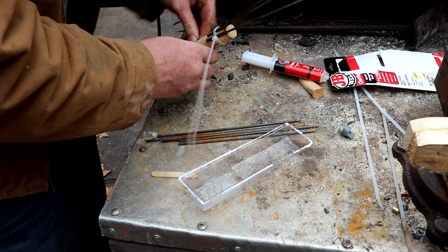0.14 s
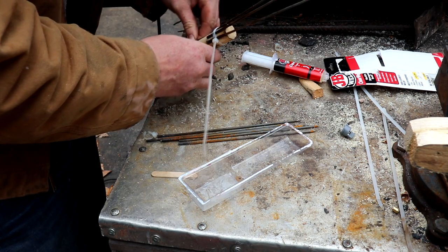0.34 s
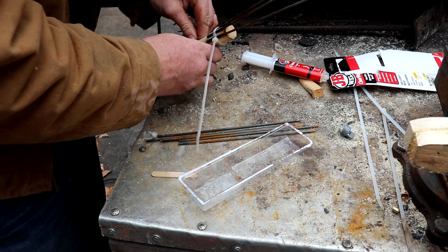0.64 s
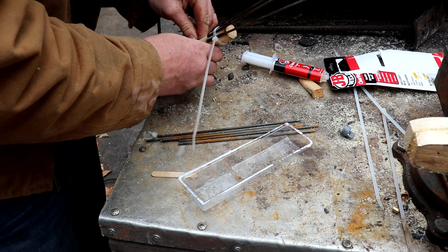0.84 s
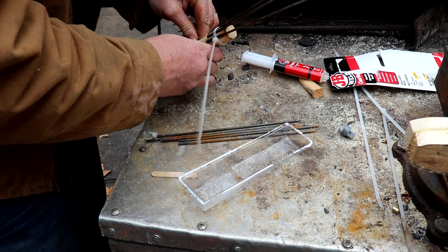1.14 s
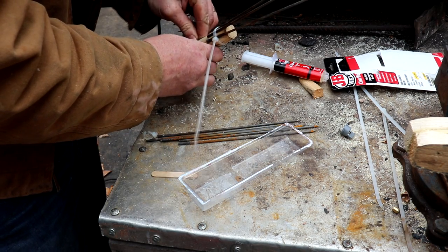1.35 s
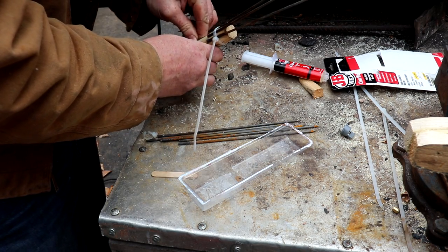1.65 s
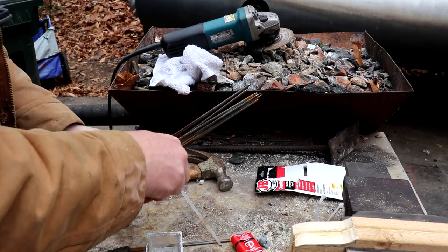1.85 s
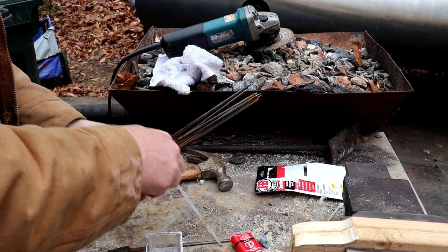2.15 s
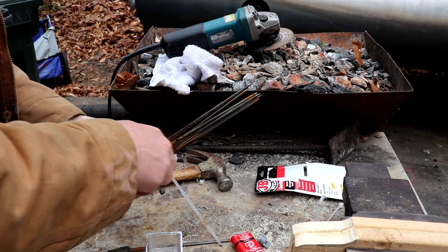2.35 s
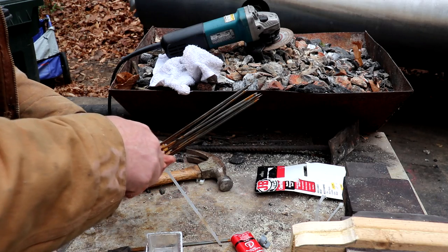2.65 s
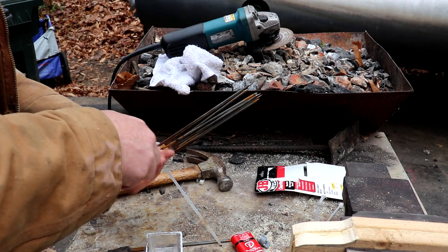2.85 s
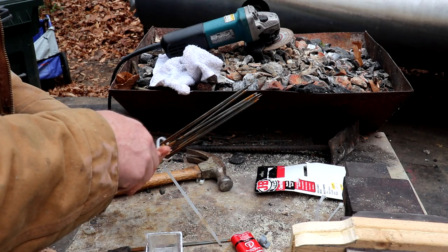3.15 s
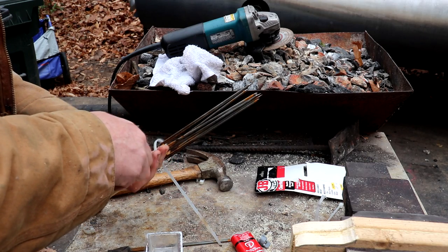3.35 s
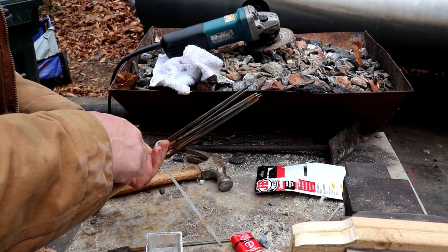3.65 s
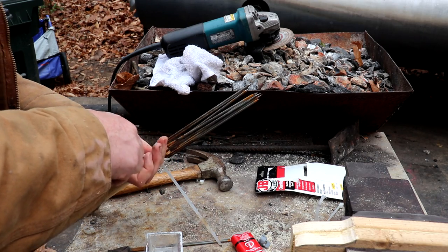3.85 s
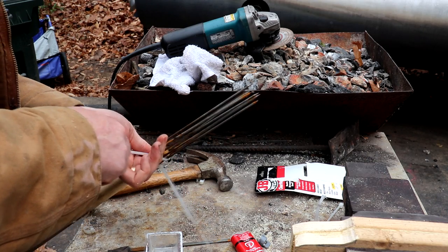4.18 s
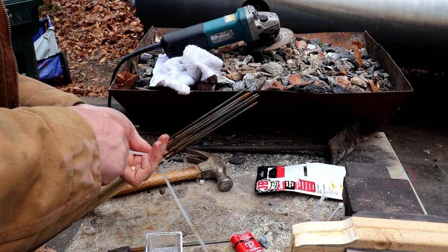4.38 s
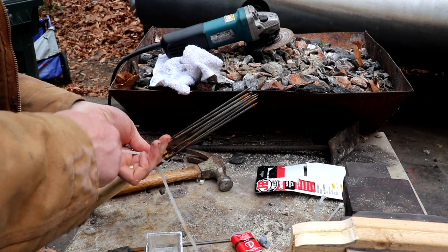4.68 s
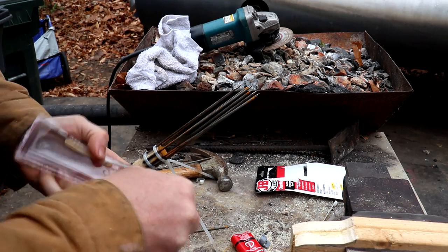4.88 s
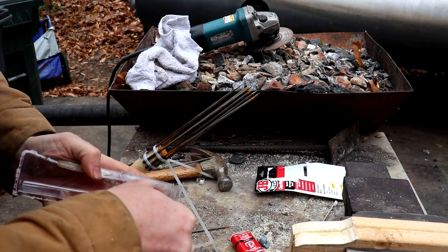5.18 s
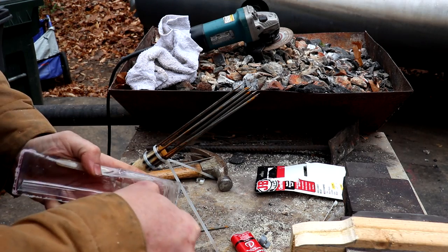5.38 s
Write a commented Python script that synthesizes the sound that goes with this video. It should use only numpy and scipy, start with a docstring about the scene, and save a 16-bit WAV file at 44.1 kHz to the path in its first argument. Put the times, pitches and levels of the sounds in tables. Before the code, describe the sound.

On a workbench in an open shed, a canvas sleeve rustles and steel rods clink and knock. One plastic zip tie ratchets in quick tugs while a thin squeal sounds further off. A second tie follows, slowing to separate sharp clicks as it tightens. Last, a plastic case snaps shut with two cracks. The microphone is close, with a low outdoor rumble behind.

```python
"""A workbench in an open shed, one microphone close by, a low rumble and faint hiss from outdoors.
A canvas sleeve rustles and single zip-tie teeth jolt a bundle of steel rods against the bench.
Further off a bird calls once and a thin squeal comes and goes. Close up, two straps run through
their ratchets in turn, tooth by tooth, the second until it is taut round the rods.
Last, a clear plastic case is snapped shut, with a brief bright echo after each crack."""
import sys
import numpy as np
from scipy import signal
from scipy.fft import rfft, irfft
from scipy.io import wavfile

SR = 44100
rng = np.random.default_rng(int(sys.argv[2]) if len(sys.argv) > 2 else 0)


def materialize(psi):
    """Save the field psi as 16-bit PCM at rate SR to the path in sys.argv[1].

    A 1-D psi becomes a single channel; in a 2-D psi each row is a channel.
    """
    bounded = np.clip(np.atleast_2d(psi).T, -1, 1)
    quanta = np.round(bounded * 32767).astype(np.int16)
    wavfile.write(sys.argv[1], SR, quanta)


N = 243431
TIME = np.arange(N) / SR


def from_db(db):
    """Decibels to gain."""
    return 10 ** (np.asarray(db) / 20)


def unit_rms(x):
    """Scale to unit power."""
    return x / np.sqrt(np.mean(x ** 2) + 1e-20)


def in_time(rows):
    """Each column of a curve at every sample."""
    times, *columns = np.transpose(rows)
    return [np.interp(TIME, times, column) for column in columns]


def drift(rate_hz):
    """A random wander of rms 1, mostly slower than rate_hz."""
    rolloff = 1 + (np.fft.rfftfreq(N, 1 / SR) / rate_hz) ** 2
    return unit_rms(irfft(rfft(rng.standard_normal(N)) / rolloff, N))


def noise(spectrum):
    """Noise of the given colour, rms 1."""
    hz, db = np.transpose(spectrum)
    grid_hz = np.fft.rfftfreq(N, 1 / SR) + 1
    colour = from_db(np.interp(np.log(grid_hz), np.log(hz), db))
    return unit_rms(irfft(rfft(rng.standard_normal(N)) * colour, N))


def clicks(times, sizes):
    """One impulse at each time."""
    return np.bincount(np.clip(np.round(times * SR).astype(int), 0, N - 1), sizes, N) + 1e-18


def crackle(impulses, tail_s, tail_db):
    """Each contact is followed by a dying spray of tiny ones, holding tail_db of its energy."""
    r = np.exp(-2 / (tail_s * SR))
    power = signal.lfilter([1 - r], [1, -r], impulses ** 2)
    return impulses + from_db(tail_db) * np.sqrt(power) * rng.standard_normal(N)


def resonance(x, hz, width_hz):
    """A band resonance of gain 1 at its top."""
    r, w = np.exp(-np.pi * width_hz / SR), 2 * np.pi * hz / SR
    return signal.lfilter(np.array([1, 0, -1]) * (1 - r * r) / 2, [1, -2 * r * np.cos(w), r * r], x)


def ring(x, hz, t60_s):
    """A unit click sets a sine of height 1 ringing."""
    r, w = np.exp(-np.log(1000) / (t60_s * SR)), 2 * np.pi * hz / SR
    return signal.lfilter([0, np.sin(w)], [1, -2 * r * np.cos(w), r * r], x)


def whistle(hz, gain, waver, waver_hz, flutter_db, flutter_hz):
    """A near sine whose pitch and level tremble."""
    phase = 2 * np.pi * np.cumsum(hz * (1 + waver * drift(waver_hz))) / SR
    return np.sqrt(2) * gain * from_db(flutter_db * drift(flutter_hz)) * np.sin(phase)


# colours of the rumble and the hiss: frequency_hz, relative_db
RUMBLE_COLOUR = [(25, -77), (50, -9), (115, 4.5), (210, 2), (400, -19), (1000, -37.5)]
HISS_COLOUR = [(300, 2), (1000, -4.5), (2000, -15.5), (3400, -13), (4800, -24), (8000, -23.5), (15000, -32)]
# level of the rumble: time_s, level_db
RUMBLE_LEVEL = [(0, -64), (1.7, -49), (4.0, -47.5), (4.2, -44), (5.52, -47)]

def outdoors(hiss_db=-53.5, wander_db=1.4):
    """From beyond the shed, a low rumble under faint hiss; the rumble is louder after the first seconds."""
    rumble_db = in_time(RUMBLE_LEVEL)[0] + wander_db * drift(rate_hz=2.6)
    return from_db(rumble_db) * noise(RUMBLE_COLOUR) + from_db(hiss_db) * noise(HISS_COLOUR)


# colour of rubbing canvas: frequency_hz, relative_db
CANVAS_COLOUR = [(50, -31), (180, 1), (800, -1), (1200, -4.5), (3500, -6), (4600, -15), (7000, -23),
                 (15000, -30)]
# strokes of sleeve and hands: start_s, end_s, level_db
SLEEVE_STROKES = [(0, 0.551, -47), (1.107, 1.367, -54), (4.092, 4.28, -41.5), (4.292, 4.66, -52.5),
                  (5.1, 5.26, -46.5), (5.521, 5.52, -42.5)]

def sleeve(attack_s=0.093, release_s=0.019, rest_db=-59.5, grain_db=2.0, grain_hz=250):
    """Near the microphone, canvas rubs in many tiny catches; strokes swell, hold and die away."""
    power = from_db(rest_db) ** 2
    for start_s, end_s, db in SLEEVE_STROKES:
        fade = np.maximum(start_s - TIME, 0) / attack_s + np.maximum(TIME - end_s, 0) / release_s
        power = power + (from_db(db) * np.exp(-fade)) ** 2
    return np.sqrt(power) * unit_rms(noise(CANVAS_COLOUR) * from_db(grain_db * drift(grain_hz)))


# jolts of the bundle: start_s, bench_thump_db, rod_ring_db, plastic_snap_db
ROD_JOLTS = [(0.05, -36, -37, -64), (0.772, -33.5, -37, -78), (0.848, -37.5, -40, -73),
             (1.036, -30, -28, -62), (1.102, -36.5, -40, -60), (1.136, -30, -26.5, -33.5),
             (1.297, -28.5, -28, -31.5), (1.414, -29, -26.5, -32.5), (1.518, -38, -26.5, -31),
             (1.636, -35.5, -25, -31), (3.316, -66.5, -44.5, -43.5)]
# modes of the rods lying on the bench: pitch_hz, gain_db, t60_s
ROD_MODES = [(144.4, -8.5, 0.26), (224.3, 1, 0.27), (297, -3, 0.076), (391, -8, 0.045), (866, -10, 0.04),
             (1252, -6, 0.036), (1356, -6.5, 0.11), (1515, -8.5, 0.082), (1765, -6.5, 0.036),
             (2060, -15, 0.11), (2426, -2.5, 0.02), (2750, -9.5, 0.038), (3320, 6.5, 0.01),
             (5000, 4, 0.0018), (6900, 8.5, 0.0021), (8800, 7.5, 0.0018), (11560, 9, 0.0018)]

def rods(scatter_db=2.0):
    """Close up, jolted rods chatter; thump, ring and snap weight the low, middle and high modes."""
    times, thump_db, ring_db, snap_db = np.transpose(ROD_JOLTS)
    blows = clicks(times, np.ones(len(times)))
    chatter = crackle(blows, tail_s=0.0056, tail_db=0.5)
    latest_jolt = np.maximum(np.searchsorted(times - .002, TIME) - 1, 0)
    out = np.zeros(N)
    for k, (hz, db, t60_s) in enumerate(ROD_MODES):
        if hz < 500:   # the heavy bench feels only the first blow
            drive, blow_db = blows, thump_db
        else:
            sharpness = np.clip((hz - 1800) / 3000, 0, 1)
            drive, blow_db = chatter, (1 - sharpness) * ring_db + sharpness * snap_db
        size = from_db(db + blow_db + scatter_db * rng.standard_normal(len(times)))
        out += (-1) ** k * ring(drive * size[latest_jolt], hz, t60_s)
    return out


# colour of the shed's reflections: frequency_hz, relative_db
SHED_COLOUR = [(150, -14.5), (400, 19), (2300, 0.5), (3200, 6.5), (4350, 2.5), (5200, 6), (12000, -1.5),
               (16000, -21.5)]

def shed(x, build_s=0.0034, body_t60_s=0.24, treble_t60_s=0.12, split_hz=7000):
    """Reflections from tools, walls and roof build up at the microphone and die, the treble first."""
    scatter = noise(SHED_COLOUR)
    body = signal.sosfiltfilt(signal.butter(2, split_hz, fs=SR, output="sos"), scatter)
    treble = scatter - body
    dying = body * 1000 ** (-TIME / body_t60_s) + treble * 1000 ** (-TIME / treble_t60_s)
    tail = (dying * (1 - np.exp(-TIME / build_s)))[:SR // 2]
    return signal.fftconvolve(x, tail / np.sqrt(np.sum(tail ** 2)))[:N]


# scuffs of fingers, rods and bench, then (last two rows) a brief bright echo after each crack
# of the case: peak_s, level_db, centre_hz, width_hz, half_length_s
SCUFFS_AND_ECHOES = [(0.209, -41, 740, 350, 0.035), (0.25, -52.5, 3470, 600, 0.18),
                     (1.175, -45.5, 2460, 1500, 0.034), (4.16, -41.5, 120, 69.5, 0.098),
                     (4.246, -37, 2730, 1600, 0.022), (5.168, -42, 4200, 900, 0.033),
                     (5.277, -41.5, 3900, 1900, 0.032)]

def scuffs_and_echoes():
    """Each scuff at the bench or echo from the shed is one broad band of noise that swells and fades."""
    out = np.zeros(N)
    for peak_s, db, hz, width_hz, half_length_s in SCUFFS_AND_ECHOES:
        swell = np.exp(-((TIME - peak_s) / half_length_s) ** 2)
        band = resonance(rng.standard_normal(N), hz, width_hz)
        out += from_db(db) * swell * unit_rms(resonance(band, hz, width_hz))
    return out


# course of the call: time_s, pitch_hz, level_db
BIRD_CALL = [(1.15, 9000, -93), (1.17, 8360, -55), (1.2, 7500, -59), (1.29, 7500, -59), (1.42, 7100, -89)]

def bird():
    """Further off, a small bird gives one thin falling call."""
    hz, db = in_time(BIRD_CALL)
    return whistle(hz, from_db(db), waver=0.0088, waver_hz=346, flutter_db=2.5, flutter_hz=40)


# bouts of squealing: start_s, length_s, start_pitch_hz, end_pitch_hz, level_db
SQUEAL_BOUTS = [(1.759, 0.21, 3300, 3194, -39.5), (1.926, 0.16, 3250, 3215, -35.5),
                (2.071, 0.12, 3224, 3275, -38.5), (2.232, 0.12, 3210, 3250, -35.5),
                (2.326, 0.15, 3203, 3300, -34), (2.528, 0.18, 3185, 3270, -43.5)]

def squeal(attack_s=0.0065, release_s=0.048):
    """A thin squeal some way off: each bout starts quickly, slides in pitch, flutters and fades."""
    out = np.zeros(N)
    for start_s, length_s, start_hz, end_hz, db in SQUEAL_BOUTS:
        age = TIME - start_s
        gate = np.clip(np.minimum(age / attack_s, (length_s - age) / release_s), 0, 1)
        hz = np.interp(age, [0, length_s], [start_hz, end_hz])
        out += whistle(hz, from_db(db) * gate, waver=0.00437, waver_hz=114, flutter_db=4, flutter_hz=65)
    return out


def tug(first_s, last_s, teeth, start_gap, end_gap):
    """When each tooth passes: within one tug the strap's speed changes smoothly."""
    even = np.linspace(0, 1, int(round(teeth)))
    bend = (1 - even) * (start_gap - 1) - even * (end_gap - 1)
    return first_s + (last_s - first_s) * (even + even * (1 - even) * bend)


# tugs on the straps: first_tooth_s, last_tooth_s, tooth_count, start_gap_ratio, end_gap_ratio
STRAP_TUGS = [(1.9444, 2.038, 6.0, 1.61, 1.21), (2.0533, 2.1373, 6.0, 0.73, 1.27),
              (2.1557, 2.2211, 7.0, 1, 0.59), (2.2304, 2.3327, 17.0, 1.26, 1.65),
              (2.3443, 2.4288, 9.0, 1.72, 0.72), (2.4359, 2.6142, 22.0, 0.96, 0.71),
              (2.6207, 2.6913, 8.0, 0.84, 2.46), (2.7542, 2.837, 5.0, 1.48, 1.66),
              (2.8666, 2.962, 6.0, 1.33, 1.67), (3.5812, 3.6961, 7.0, 1.57, 1.05),
              (3.7649, 3.8505, 7.0, 1.8, 0.48), (3.8627, 3.9865, 8.0, 0.48, 0.91),
              (4.0093, 4.1288, 12.0, 1.53, 0.71), (4.1398, 4.2476, 8.0, 0.58, 1.74)]   # ratios are to the tug's mean gap between teeth
# load on the pawl sets the snap, the strap's angle the treble: time_s, snap_db, treble_db
FIRST_STRAP_PULL = [(1.945, -1.5, 15.5), (2.06, -1.5, 10), (2.205, 1.5, 3.5), (2.229, -10, 3),
                    (2.26, -3, 6.5), (2.32, -3.5, 8.5), (2.56, -3, 8), (2.69, -7, 8.5), (2.96, -4.5, 2)]
SECOND_STRAP_PULL = [(3.58, 3, 2.3), (3.88, 1, 2.1), (4.06, -3, 9.4), (4.15, -4.5, 4.5), (4.248, 0, 2.7)]
# last teeth of the taut tie: start_s, snap_db
FORCED_TEETH = [(4.281, -4.5), (4.3446, -4), (4.388, -2), (4.4678, 0), (4.5613, 1.5), (4.6104, 0.5),
                (4.726, 2)]

def strap_teeth(forced_treble_db=7.5):
    """Teeth run by in tugs, then are forced one at a time: times, snap_db and treble_db for them all."""
    run_s = np.concatenate([tug(*row) for row in STRAP_TUGS])
    pull_s, snap_db, treble_db = np.transpose(FIRST_STRAP_PULL + SECOND_STRAP_PULL)
    forced_s, forced_db = np.transpose(FORCED_TEETH)
    return (np.r_[run_s, forced_s],
            np.r_[np.interp(run_s, pull_s, snap_db), forced_db],
            np.r_[np.interp(run_s, pull_s, treble_db), np.full(len(forced_s), forced_treble_db)])


def pawl(times, slip_s=0.0006, slip_db=-6, wander=0.06, scrape_s=0.004):
    """The pawl slips off a tooth, scrapes and slaps the next; moulded teeth all scrape nearly alike."""
    slaps = clicks(times, np.ones(len(times)))
    lead_s = slip_s * np.exp(wander * drift(rate_hz=3))
    slips = np.interp(TIME + lead_s, TIME, slaps)
    common_scrape = crackle(clicks(np.zeros(1), np.ones(1)), scrape_s, tail_db=-7)[:SR // 100]
    scrapes = crackle(np.convolve(slips, common_scrape)[:N], scrape_s, tail_db=-8.5)
    return slaps + from_db(slip_db) * scrapes


def bench_echo(x, lag_s=0.00145, echo_db=-10):
    """The bench top throws the sound back to the microphone just after the direct sound."""
    return x + from_db(echo_db) * np.interp(TIME - lag_s, TIME, x, left=0)


# modes of strap and lock head in three grips: pitch_hz, width_hz (before nylon loss), gain_db
FIRST_TIE_MODES = [(946, 129, 4), (1716, 38, 2.5), (2137, 460, -0.5), (3510, 730, -3.5), (4120, 150, 3),
                   (4670, 310, -4), (7230, 2100, -6.5), (9900, 250, 5), (10530, 250, 15),
                   (10830, 750, 14.5), (13360, 480, 15), (13230, 650, 15.5), (13740, 380, 11)]
SECOND_TIE_MODES = [(790, 440, -7.5), (1690, 21, -1), (2340, 39, -1), (2920, 154, -0.5), (4150, 510, -1),
                    (5770, 58, -3), (7980, 67, -5), (9100, 860, -6.5), (11360, 290, 14.5),
                    (11720, 47, 14.5), (13200, 1420, 6), (14270, 1360, 8.5), (14570, 470, 9)]
TAUT_TIE_MODES = [(1460, 990, -6.5), (2720, 79, 1.5), (2680, 620, 1), (3860, 1200, -5), (5800, 550, -5),
                  (7950, 850, -1.5), (9730, 380, 10), (11310, 240, 19.5), (11760, 510, 19.5),
                  (13400, 2100, 4.5), (14200, 300, 7.5), (15400, 310, -4.5)]

def zip_ties(second_tie_s=3.3, taut_s=4.265, nylon_loss=0.045, scatter_db=0.75, gain_db=-0.5):
    """Close up, the pawl strikes tooth after tooth: the head snaps high, the strap ticks lower."""
    times, snap_db, treble_db = strap_teeth()
    tooth_grip = np.searchsorted([second_tie_s, taut_s], times)
    contacts = pawl(times)
    nearest_tooth = np.searchsorted((times[1:] + times[:-1]) / 2, TIME)
    out = np.zeros(N)
    for grip, modes in enumerate([FIRST_TIE_MODES, SECOND_TIE_MODES, TAUT_TIE_MODES]):
        for k, (hz, width_hz, db) in enumerate(modes):
            snap_share = 1 if hz > 8800 else 0.41   # the low tick is steadier than the snap
            tooth_db = db + snap_db * snap_share + treble_db * (hz > 12600)
            size = (tooth_grip == grip) * from_db(tooth_db + scatter_db * rng.standard_normal(len(times)))
            damped_width_hz = np.hypot(width_hz, nylon_loss * hz)   # nylon damps high modes fast
            out += (-1) ** k * resonance(contacts * size[nearest_tooth] + 1e-18, hz, damped_width_hz)
    return from_db(gain_db) * bench_echo(out + strap_zing(contacts)) + rod_grind(times[times > taut_s])


# ring of the loose strap end: peak_s, half_length_s, pitch_hz, width_hz, gain_db
LOOSE_END = (4.085, 0.041, 3700, 260, 3)

def strap_zing(contacts):
    """The teeth shake the free end of the strap, which sings for a moment."""
    peak_s, half_length_s, hz, width_hz, db = LOOSE_END
    swell = np.exp(-((TIME - peak_s) / half_length_s) ** 2)
    return from_db(db) * resonance(contacts * swell + 1e-18, hz, width_hz)


def rod_grind(times, gain_db=3):
    """Once the tie is taut, every tooth grinds the rods together."""
    jerks = clicks(times, np.full(len(times), from_db(gain_db)))
    grit = crackle(jerks, tail_s=0.008, tail_db=-1.0) - jerks
    return resonance(grit, hz=2300, width_hz=990)


# blows of the closing lid: start_s, blow_db, place (0 first catch, 1 second), cutoff_hz
CASE_BLOWS = [(5.1354, -21, 0.25, 8850), (5.1412, -3.5, 0.17, 14800), (5.1918, 0.5, 0.51, 795),
              (5.2551, -2, 1, 12000)]
# modes of the case: pitch_hz, width_hz, first_catch_db, second_catch_db
CASE_MODES = [(332, 71, 8.5, 21.5), (720, 174, 14.5, 18), (1134, 113, 18, 25.5), (1590, 210, 16, 25),
              (2270, 300, 28.5, 19), (3080, 170, 25.5, 30), (3690, 310, 26, 21), (4330, 370, 24.5, 11.5),
              (4970, 450, 20.5, 12), (7300, 970, 16.5, 8), (8340, 850, 18.5, 8.5), (11200, 2800, 4.5, 2)]

def plastic_case(gain_db=-1.0):
    """Close up, two catches crack home, a dull knock between; the place struck sets the mix of modes."""
    out = np.zeros(N)
    for start_s, blow_db, place, cutoff_hz in CASE_BLOWS:
        blow = clicks(np.array([start_s]), from_db([blow_db]))
        crack = crackle(blow, tail_s=0.0021, tail_db=-1.0)
        contact = signal.sosfilt(signal.butter(2, cutoff_hz, fs=SR, output="sos"), crack)
        for k, (hz, width_hz, first_db, second_db) in enumerate(CASE_MODES):
            mode_db = np.interp(place, [0, 1], [first_db, second_db])
            out += (-1) ** k * from_db(mode_db) * resonance(contact, hz, width_hz)
    return from_db(gain_db) * out


def scene(room_db=-15.5, rods_send_db=2, case_send_db=-6):
    """In mono at the bench: close handling and the shed's answer, over the far sounds."""
    ties, jolts, clacks = zip_ties(), rods(), plastic_case()
    room = from_db(room_db) * shed(ties + from_db(rods_send_db) * jolts + from_db(case_send_db) * clacks)
    background = squeal() + bird() + sleeve() + scuffs_and_echoes() + outdoors()
    return (ties + jolts + clacks + room + background)[None]


def record(dry, cutoff_hz=16500):
    """The microphone's signal loses its very top, and any peak beyond full scale is clipped."""
    lowpass = signal.ellip(8, .2, 70, cutoff_hz, fs=SR, output="sos")
    return np.clip(signal.sosfilt(lowpass, dry), -1, 1)


dry = scene()
out = record(dry)
materialize(out)
```